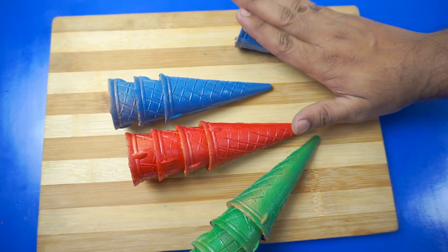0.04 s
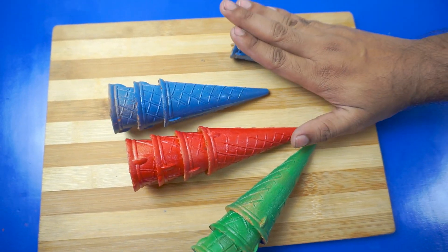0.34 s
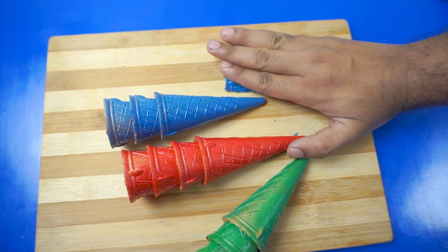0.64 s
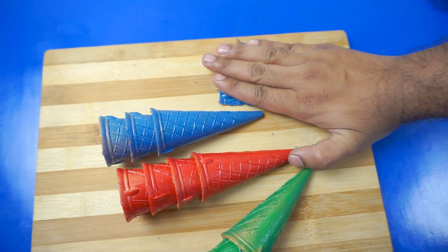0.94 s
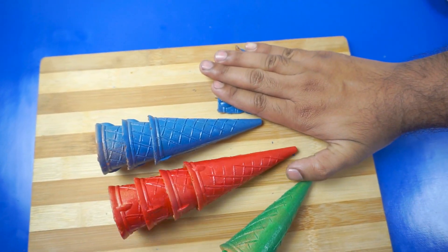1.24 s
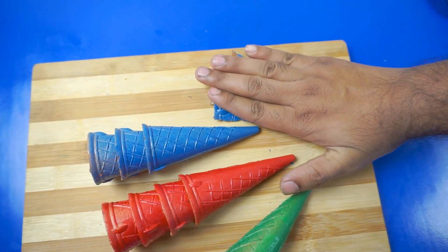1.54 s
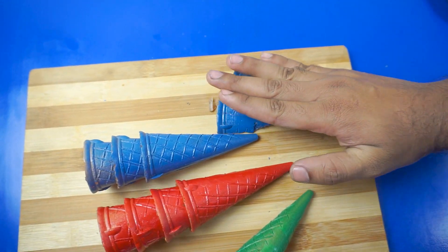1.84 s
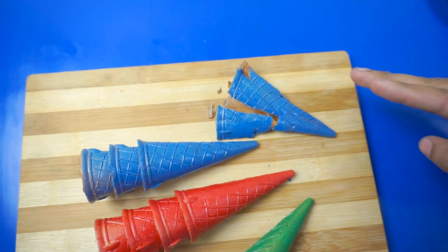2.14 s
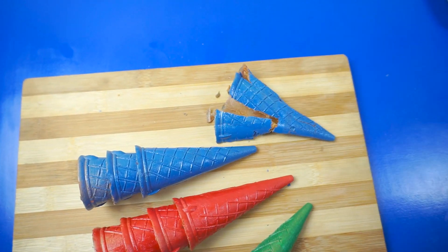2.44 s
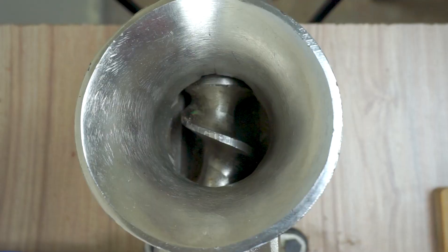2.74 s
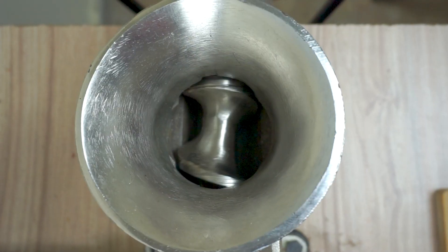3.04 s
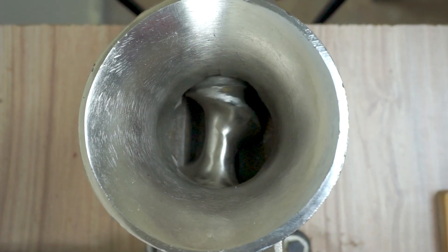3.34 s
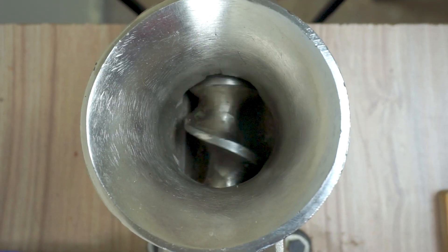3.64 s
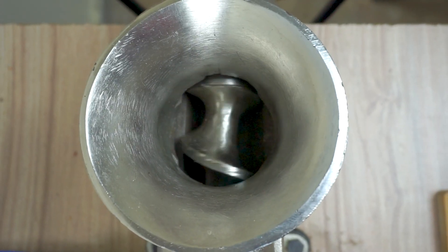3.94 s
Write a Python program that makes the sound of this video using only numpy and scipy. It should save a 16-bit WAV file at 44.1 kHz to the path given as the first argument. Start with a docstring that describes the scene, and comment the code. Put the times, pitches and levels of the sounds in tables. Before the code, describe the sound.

Crisp crackling of a crushed wafer cone, followed by a meat grinder humming and knocking.

```python
"""First comes a short scuff on a wooden board, then a palm crushes a wafer cone: a swarm of tiny breaks
and sharp snaps rings in its hollow shell, and the board thumps. Crumbs rustle as the hand lifts.
After a lull an electric meat grinder spins up and runs empty: its motor hums, its gears whir, its metal
housing rings and its screw (the auger) knocks a few times. The wafer echoes in a small, hard room."""
import sys
import numpy as np
from scipy import signal
from scipy.fft import rfft, irfft
from scipy.io import wavfile

SR = 44100
rng = np.random.default_rng(int(sys.argv[2]) if len(sys.argv) > 2 else 0)


def generate_wav(sig):
    """Save sig (samples, or channels by samples) to the path in sys.argv[1] as 16-bit PCM at SR."""
    pcm = np.round(np.clip(np.atleast_2d(sig).T, -1, 1) * 32767).astype(np.int16)
    wavfile.write(sys.argv[1], SR, pcm)


N = 176400
T = np.arange(N) / SR

# tone colour of breaking wafer: f/Hz, level/dB
FRACTURE_COLOUR = [(500, -53), (1500, -14.5), (3000, -7), (9000, -4), (14000, -1), (16000, 0.5)]


def cone():
    """The wafer crumbles, caves in and snaps: bright cracks, plus the hollow note of its shell."""
    # strength of the crumbling: t/s, bright level/dB, hollow level/dB
    crush = [(.26, -53, -74), (.30, -40.5, -61), (.38, -30, -47), (.53, -28, -49), (.59, -36, -32.5),
             (.74, -34, -46.5), (.87, -37, -51.5), (1.0, -47, -57), (1.12, -39.5, -52.5), (1.36, -85, -73)]
    # bits of wall cave in: t/s, length/s, level/dB, hollow share/dB
    collapses = [(0.356, 0.0074, -28, -6.5), (0.441, 0.005, -27.5, -8.5), (0.489, 0.0038, -26.5, -4),
                 (0.529, 0.038, -27, -6), (0.667, 0.021, -27, -22), (0.72, 0.014, -25, -11.5),
                 (0.807, 0.019, -30, -3), (1.058, 0.017, -33.5, -1.5), (1.098, 0.005, -32, 1)]
    # single sharp snaps: t/s, level/dB, f/Hz of the broken piece
    snaps = [(0.219, -31, 4860), (.277, -28.5, 11000), (.3, -22, 8500), (0.33, -20, 9400),
             (.413, -18, 5370), (.4781, -16.5, 11700), (.547, -14.5, 4000), (0.714, -21, 4030),
             (0.8579, -13.5, 6500), (0.9323, -20.5, 13300), (1.015, -25.5, 9400), (1.0328, -24.5, 13300),
             (1.099, -20, 9300), (1.2298, -29, 14200), (1.242, -30.5, 13000), (1.2995, -28, 14600),
             (1.535, -42.5, 13000), (1.896, -44, 8000), (2.05, -45, 12600), (2.17, -53, 13800),
             (2.804, -45, 14000)]
    # tone colour of the shell: f/Hz, level/dB
    shell_colour = [(200, -35), (850, -18), (1100, -2.5), (1350, 3.5), (1900, -3.5), (2650, 3.5),
                    (3500, -2), (5500, -4.5), (12000, -18)]
    clump_db, collapse_fade_s, snap_boost_db = 3.0, 0.004, 14
    clumps = from_db(clump_db * np.tanh(drift(96)))
    swarm = rms_one(crackle(per_s=900, spread_db=1) * clumps)
    splinters = crackle(per_s=4000, spread_db=3)
    bright = swarm * level(crush, column=1)
    hollow = splinters * level(crush, column=2)
    for s, length_s, db, hollow_db in collapses:
        fade = np.exp(-np.clip((T - s - length_s) / collapse_fade_s, 0, 20))
        run = splinters * from_db(db) * (T >= s) * fade
        bright += run
        hollow += run * from_db(hollow_db)
    for s, db, hz in snaps:
        snap = from_db(db + snap_boost_db) * fracture(hz, ring_s=0.0035, ring_share=0.7)
        shell_db = -9 - 9 * np.log2(hz / 5800)  # small, high pieces barely stir the shell
        i = int(s * SR)
        bright[:, i:i + snap.shape[1]] += snap
        hollow[:, i:i + snap.shape[1]] += snap * from_db(shell_db)
    return colour(bright, FRACTURE_COLOUR) + colour(hollow, shell_colour)


def fracture(piece_hz, ring_s, ring_share, size=500):
    """One break: a click and a brief shiver, tinged with the pitch of the broken piece."""
    shiver = rng.standard_normal((2, size)) + 0.74 * rng.standard_normal(size)  # partly alike in both ears
    burst = ring_share * rms_one(shiver * np.exp(-T[:size] / ring_s)) / np.sqrt(size)
    burst[:, 1] += pan(rng.normal(0, 1.3))[:, 0]  # the click
    ring = signal.lfilter(*signal.iirpeak(piece_hz, Q=1.56, fs=SR), burst)
    return rms_one(burst + 1.03 * ring) / np.sqrt(size)


def crackle(per_s, spread_db, pieces=8):
    """A steady swarm of tiny breaks in pieces of all sizes, most faint and a few stronger."""
    # pitch range of the pieces: lowest f/Hz, highest f/Hz
    piece_range = (3500, 15500)
    strengths = from_db(spread_db * np.minimum(rng.exponential(1, N), 4.5)) * rng.choice([-1, 1], N)
    clicks = strengths * (rng.random(N) < per_s / SR)
    piece = rng.integers(0, pieces, N)
    swarm = 0
    for k, hz in enumerate(np.linspace(*piece_range, pieces)):
        crack = fracture(hz, ring_s=0.00067, ring_share=2)
        swarm += signal.oaconvolve((clicks * (piece == k))[None], crack, axes=1)[:, :N]
    return rms_one(swarm)


def rubbing():
    """The cone scuffs before it gives way; afterwards crumbs rustle, drop and squeak."""
    # strength of the scuff, the rustle and the falling crumbs: t/s, level/dB
    scuff_levels = [(0, -76.5), (.064, -70), (.07, -36), (.125, -50), (.17, -69), (.3, -61)]
    rustle_levels = [(1.35, -72), (1.5, -76.5), (1.63, -52), (1.76, -49), (1.83, -57.5), (2.0, -71.5),
                     (2.7, -84)]
    tick_levels = [(1.4, -69), (1.75, -60.5), (2.53, -77)]
    # tone colours of the scuff and the rustle: f/Hz, level/dB
    scuff_colour = [(170, -6), (400, -18), (800, -16), (1100, 0), (1550, 2), (1950, -15), (4000, -17),
                    (4900, -5), (15000, -17)]
    rustle_colour = [(1000, -14), (1350, 1), (1650, -2), (2600, 4.5), (4500, 5.5), (6000, -2.5),
                     (15000, 2.5)]
    # brief friction squeaks: t/s, half length/s, f/Hz, level/dB
    squeaks = [(1.768, 0.018, 1388, -57.5), (2.28, 0.039, 4750, -76)]
    scuff = colour(crackle(per_s=2500, spread_db=3.5) * level(scuff_levels), scuff_colour)
    rustle = colour(crackle(per_s=700, spread_db=1) * level(rustle_levels), rustle_colour)
    ticks = colour(crackle(per_s=49, spread_db=2) * level(tick_levels), FRACTURE_COLOUR)
    return scuff + rustle + ticks + swells(squeaks, wander_hz=30.2)


def hand():
    """The palm thuds on the board, which rumbles under its push; the arm swishes away."""
    # the palm lands: t/s, level/dB
    landings = [(.563, -39.5), (1.105, -44.5)]
    # low notes of the board: f/Hz, level/dB, time to fade by 60 dB/s
    board_notes = [(48.3, -3, .35), (97.9, -2.5, 0.61), (240.4, -13.5, .3), (447, -15.5, 0.33)]
    # strength of the rumble and the swish: t/s, level/dB
    press_levels = [(0, -57), (.25, -60), (.545, -70), (.57, -46), (.68, -46), (.85, -51), (1.04, -60),
                    (1.11, -44.5), (1.18, -50), (1.42, -77)]
    swish_levels = [(2.1, -77), (2.45, -65), (2.8, -63), (2.88, -60)]
    # their tone colours: f/Hz, level/dB
    board_colour = [(35, -6), (100, -3.5), (150, -6), (220, -13.5), (750, -19), (1500, -25)]
    swish_colour = [(200, 6.5), (1500, -11), (3100, -1), (5000, -13), (15000, -29)]
    thuds = np.zeros(N)
    for s, db in landings:
        age = np.maximum(T - s, 0)
        for hz, note_db, fade_s in board_notes:
            thuds += from_db(db + note_db - 60 * age / fade_s) * np.sin(2 * np.pi * hz * age)
    rumble = colour(noise() * level(press_levels), board_colour)
    swish = colour(noise() * level(swish_levels), swish_colour)
    return thuds + rumble + swish


def grinder():
    """The motor spins up; the noise of gears and housing grows with its speed and pulses with the teeth."""
    # motor speed, as the pitch of its hum: t/s, f/Hz
    speed = [(2.85, 68.14), (2.92, 93.26), (3.02, 103.3), (3.1, 105.2), (3.2, 106.1), (3.85, 105.9),
             (4, 105.5)]
    pulses_per_turn, running_hz = 4, speed[-1][1]
    jitter, flutter_db, tooth_depth = 0.002, 1.24, 0.12
    hz = np.interp(T, *np.transpose(speed)) * (1 + jitter * drift(8))
    turns = np.cumsum(hz) / SR / pulses_per_turn
    hum = motor(turns, pulses_per_turn)
    mesh = gear_mesh(turns, samples_per_turn=int(pulses_per_turn * SR / running_hz))
    friction = rise(start_s=2.85, rise_s=0.0049) * (hz / running_hz) ** 1.72
    friction *= from_db(flutter_db * drift(26))
    friction *= 1 + tooth_depth * np.cos(2 * np.pi * pulses_per_turn * turns)
    return pan(-1.77) * hum + pan(0.5) * (gears(friction, mesh) + housing(friction))


def motor(turns, pulses_per_turn):
    """The frame shudders at the start, then hum and gear whine follow the turning motor."""
    # the frame shakes as the speed passes its own notes: t/s, half length/s, f/Hz, level/dB
    shudders = [(2.89, .028, 230, -32), (2.92, 0.037, 480, -30.5), (2.975, 0.027, 395, -29),
                (2.965, 0.035, 960, -33.5)]
    # tones of the hum and whine: cycles per turn, level/dB
    tones = [(4, -24), (8, -34), (12, -29.2), (16, -44), (17, -47), (20, -37.5), (24, -32.3), (28, -37.5),
             (40, -46), (150, -55), (200, -58)]
    hum = swells(shudders, wander_hz=25)
    low_onset = rise(start_s=2.885, rise_s=0.047)
    high_onset = rise(start_s=3.01, rise_s=0.025)  # higher tones come in near full speed
    for per_turn, db in tones:
        waver_db = (0.8 if per_turn == pulses_per_turn else 2.2) * drift(12.4)
        onset = low_onset if per_turn <= 2 * pulses_per_turn else high_onset
        tone = np.sqrt(2) * np.sin(2 * np.pi * (per_turn * turns + rng.random()))
        hum += from_db(db + waver_db) * onset * tone
    return hum


def gear_mesh(turns, samples_per_turn):
    """The same teeth meet again and again: a rough pattern that repeats every turn."""
    place = (turns % 1 * samples_per_turn).astype(int)
    pattern = widen(rng.standard_normal((2, N))[:, place])
    return signal.sosfilt(signal.butter(2, [20, 2500], "band", fs=SR, output="sos"), pattern)


def gears(friction, mesh):
    """Rubbing teeth add a whir to the repeating pattern of the gears."""
    # tone colour of the gears: f/Hz, level/dB
    gear_colour = [(25, -21), (44, 5), (58, -8), (85, 9), (150, -10.5), (260, 2), (480, 0), (680, 2),
                   (850, 0), (1250, -1), (1700, -6), (3300, -9.5), (5200, -18), (6800, -21), (8300, -25.5),
                   (10000, -21.5), (16000, -33.5)]
    whir_db, mesh_db = -28.5, -31
    return colour(friction * (from_db(whir_db) * noise() + from_db(mesh_db) * mesh), gear_colour)


def housing(friction):
    """Friction shakes the grinder's metal body, which rings at its own notes."""
    # notes of the body: f/Hz, level/dB, time to fade by 60 dB/s
    body_notes = [(2056, -3.5, 0.14), (4000, -7.5, 0.066), (4102, -3, 0.057), (5380, -10.5, 0.12),
                  (6530, -12.5, 0.037)]
    shaking = friction * noise() + 1e-18
    ringing = 0
    for hz, db, fade_s in body_notes:
        decay = np.exp(-np.log(1000) / (fade_s * SR))
        feedback = [1, -2 * decay * np.cos(2 * np.pi * hz / SR), decay ** 2]
        gain = from_db(db) * np.sqrt((1 - decay ** 2) / 2)
        ringing += gain * signal.lfilter([1, 0, -1], feedback, shaking)
    return from_db(-41) * ringing


def auger():
    """The screw knocks in its barrel: a short rattle, a bright metal tick and its own clank."""
    # knocks: t/s, level/dB, tick adjustment/dB, clank adjustment/dB
    knocks = [(2.852, -25, -11, -32), (2.896, -41, 10.5, -20), (3.015, -25.5, -4, -27),
              (3.185, -23, 2.5, 1.5), (3.261, -28.5, -19, 2.5), (3.445, -30.5, -1, -12),
              (3.528, -22.5, -4.5, 4.5), (3.708, -30, 2, -10), (3.975, -28.5, 1.5, 3.5)]
    # tone colours of the rattle and the tick: f/Hz, level/dB
    rattle_colour = [(40, -6), (350, 8.5), (1650, 1.5), (2200, 10.5), (3300, 2), (5000, -7), (6800, -7),
                     (16000, -30)]
    tick_colour = [(5000, -22), (10000, 6), (11000, -9), (12000, 11), (16000, -29)]
    rattle_decay_s, tick_decay_s = 0.02, 0.0053
    clank_hz, clank_fade_s = 2035, 0.11
    rattle, tick, clank = np.zeros((3, N))
    note = np.sin(2 * np.pi * clank_hz * T) * from_db(-60 * T / clank_fade_s)
    for s, db, tick_db, clank_db in knocks:
        i = int(s * SR)
        rattle[i:] += from_db(db) * np.exp(-T[:N - i] / rattle_decay_s)
        tick[i:] += from_db(db + tick_db - 6.5) * np.exp(-T[:N - i] / tick_decay_s)
        clank[i:] += from_db(db + clank_db - 2.5) * note[:N - i]
    return colour(rattle * noise(), rattle_colour) + colour(tick * noise(), tick_colour) + clank


def room(x):
    """Hard walls add a smooth echo, which dies sooner in the treble."""
    t, out = T[:SR // 2], x
    for band, fade_s, db in (("low", 0.55, -4.5), ("high", 0.2, -6.5)):
        fade = from_db(-60 * t / fade_s) * (t > .003)
        tail = rms_one(rng.standard_normal((2, len(t))) * fade) / np.sqrt(len(t))
        tail = signal.sosfilt(signal.butter(2, 4500, band, fs=SR, output="sos"), tail)
        out = out + from_db(db) * signal.fftconvolve(x, tail, axes=1)[:, :N]
    return out


def air():
    """The room's quiet, steady rumble."""
    # its tone colour: f/Hz, level/dB
    air_colour = [(25, -3), (65, -8), (90, 1.5), (125, -6.5), (170, 0.5), (280, -15.5), (600, -30),
                  (5000, -33), (16000, -26)]
    return from_db(-64.5) * colour(noise(), air_colour)


def swells(rows, wander_hz):
    """Rough, unsteady tones that swell and fade."""
    out = 0
    for s, half_s, hz, db in rows:
        cycles = np.cumsum(hz + wander_hz * drift(59.4)) / SR
        swell = from_db(db) * np.exp(-((T - s) / half_s) ** 2)
        out += swell * np.sqrt(2) * np.sin(2 * np.pi * cycles)
    return out


def from_db(db):
    """Decibels to gain."""
    return 10 ** (np.asarray(db) / 20)


def rms_one(x):
    """Scale to an average (RMS) level of 1."""
    return x / np.sqrt(np.mean(x ** 2) + 1e-20)


def level(rows, column=1):
    """Gain along a dB curve in time, silent outside it."""
    rows = np.array(rows)
    return from_db(np.interp(T, rows[:, 0], rows[:, column], left=-200, right=-200))


def rise(start_s, rise_s):
    """Smooth approach to full strength."""
    return 1 - np.exp(-np.maximum(T - start_s, 0) / rise_s)


def drift(rate_hz):
    """A smooth random wobble of size about 1; a higher rate wobbles faster."""
    step, warm_up = 40, 2000
    decay = np.exp(-2 * np.pi * rate_hz * step / SR)
    white = rng.standard_normal(N // step + warm_up + 2)
    slow = signal.lfilter([1], [1, -2 * decay, decay ** 2], white)[warm_up:]
    return np.interp(np.arange(N) / step, np.arange(len(slow)), rms_one(slow))


def at_hz(points, hz):
    """Read a curve between its points, with octaves evenly spaced."""
    point_hz, values = np.transpose(points)
    return np.interp(np.log(hz + 0.0011), np.log(point_hz), values)


def colour(x, spectrum, size=8192):
    """Filter a sound to a tone colour; white noise keeps its overall level."""
    gain = rms_one(from_db(at_hz(spectrum, np.fft.rfftfreq(size, 1 / SR))))
    cepstrum = irfft(np.log(gain))[:size // 2]  # keeping one half puts all ringing after a click
    cepstrum[1:] *= 2
    response = irfft(np.exp(rfft(cepstrum, size)))
    return signal.fftconvolve(x, response[None], axes=1)[:, :N]


def pan(db):
    """Gains that make the left louder than the right by db."""
    return from_db([[db / 2], [-db / 2]])


def widen(pair):
    """Two unrelated signals become left and right, alike in the bass and apart in the treble."""
    # how alike the two ears are: f/Hz, likeness from 0 to 1
    likeness = [(100, 1), (300, 0.84), (1400, 0.58), (7000, 0.05), (15000, 0)]
    alike = np.clip(at_hz(likeness, np.fft.rfftfreq(N, 1 / SR)), 0, .995)
    mid, side = irfft(rfft(pair) * np.sqrt([(1 + alike) / 2, (1 - alike) / 2]), N)
    return np.array([mid + side, mid - side])


def noise():
    """White stereo noise."""
    return widen(rng.standard_normal((2, N)))


def scene():
    """Cone, hand and grinder over the room's quiet rumble."""
    return room(cone() + rubbing()) + hand() + grinder() + auger() + air()


def record(dry):
    """The highest treble is cut steeply."""
    cutoff_hz = 15850
    return signal.sosfilt(signal.ellip(12, .1, 80, cutoff_hz, fs=SR, output="sos"), dry)


dry = scene()
out = record(dry)
generate_wav(out)
```